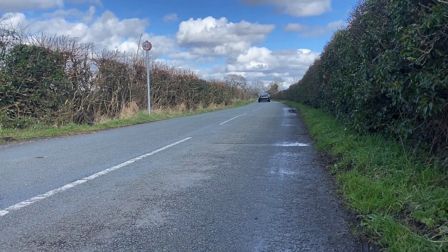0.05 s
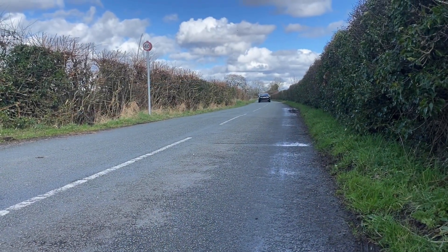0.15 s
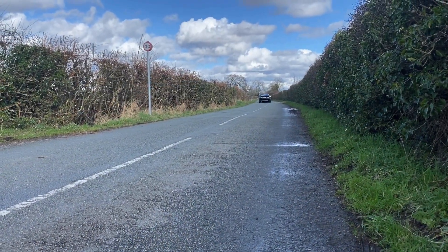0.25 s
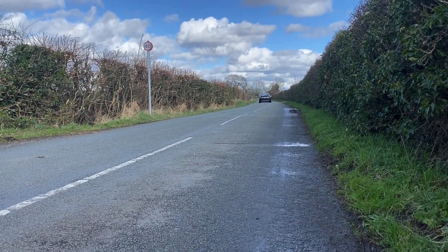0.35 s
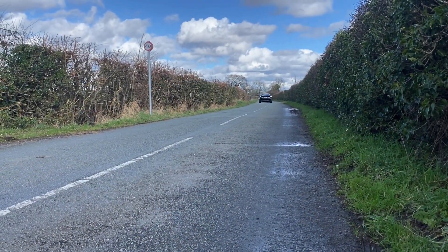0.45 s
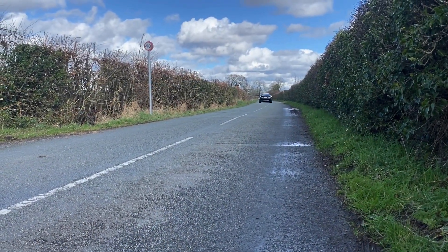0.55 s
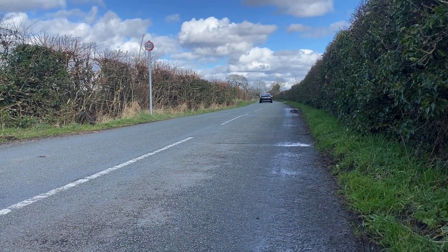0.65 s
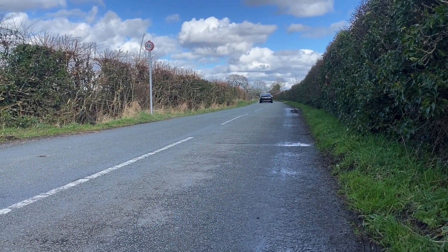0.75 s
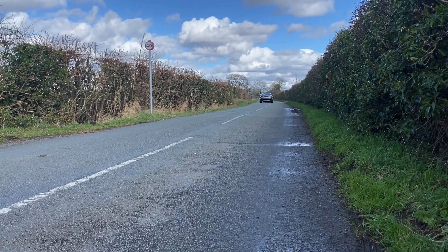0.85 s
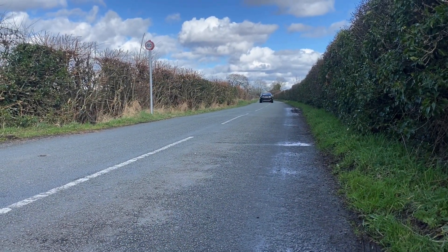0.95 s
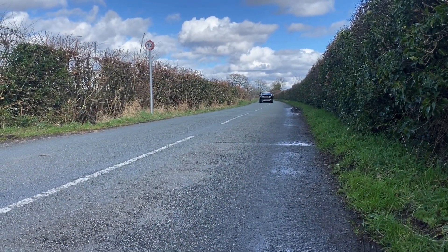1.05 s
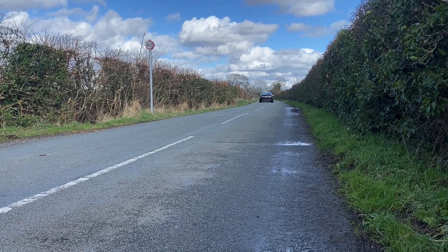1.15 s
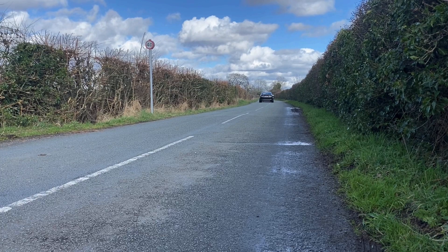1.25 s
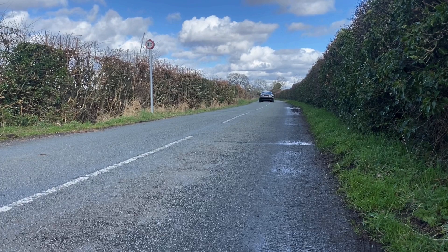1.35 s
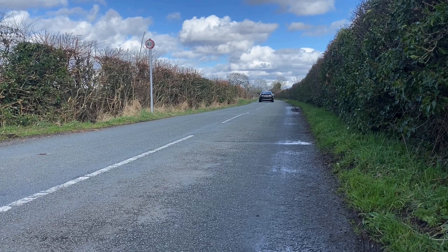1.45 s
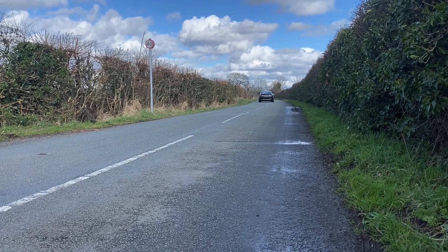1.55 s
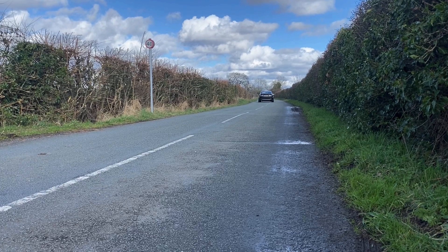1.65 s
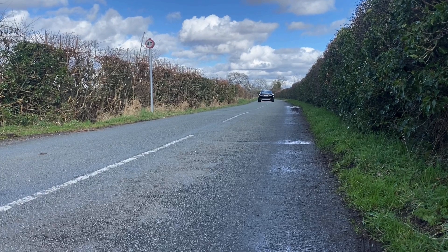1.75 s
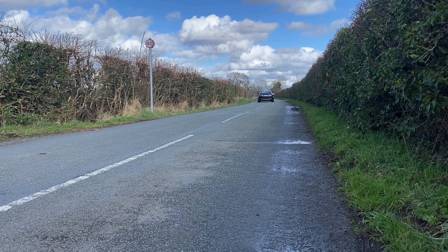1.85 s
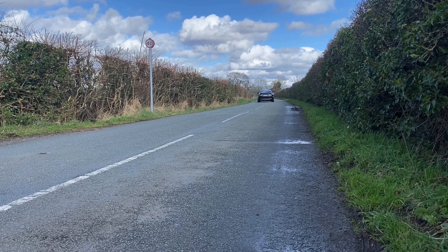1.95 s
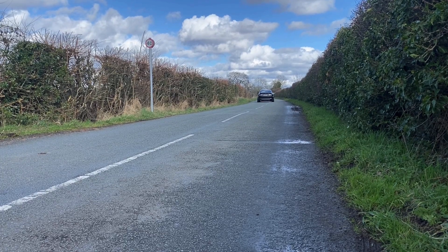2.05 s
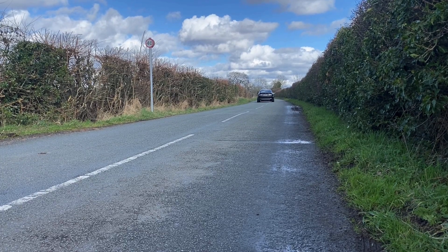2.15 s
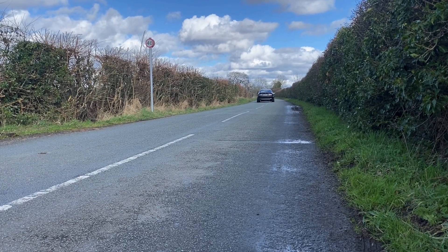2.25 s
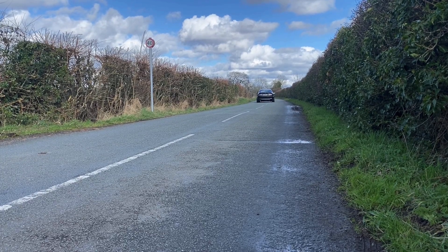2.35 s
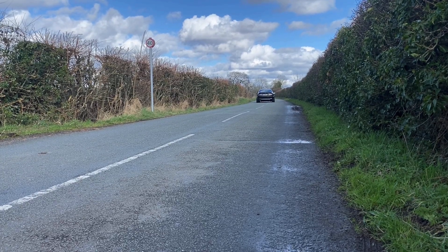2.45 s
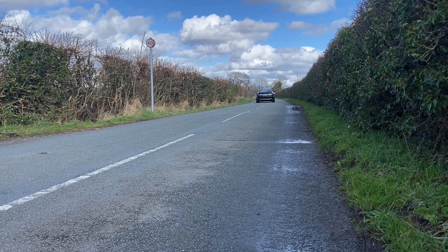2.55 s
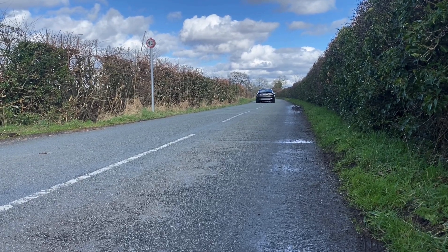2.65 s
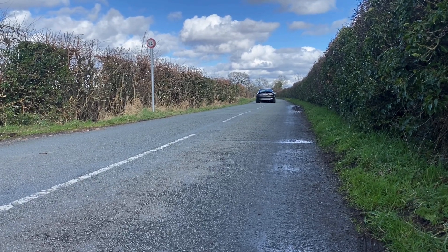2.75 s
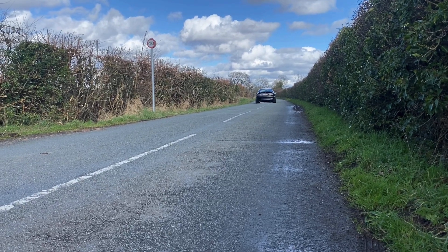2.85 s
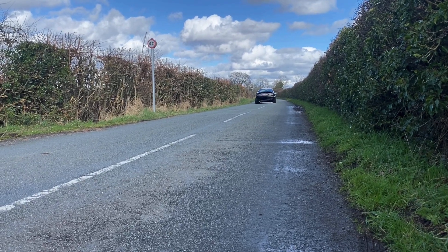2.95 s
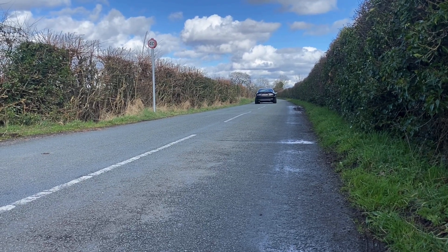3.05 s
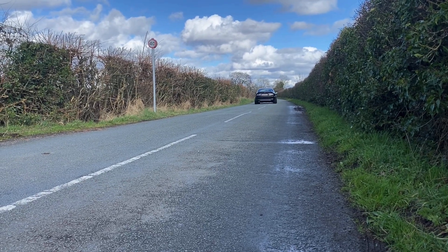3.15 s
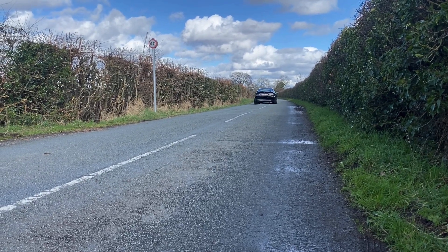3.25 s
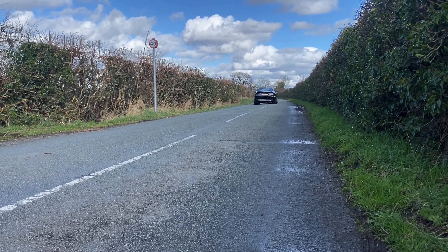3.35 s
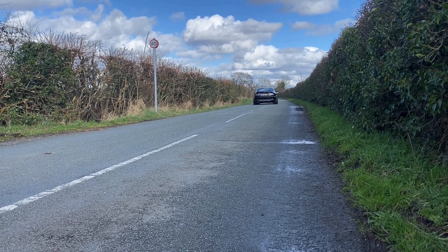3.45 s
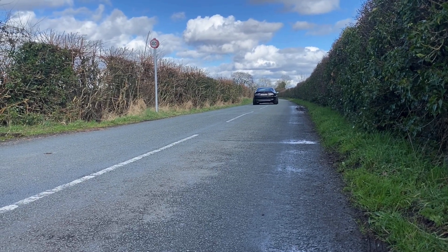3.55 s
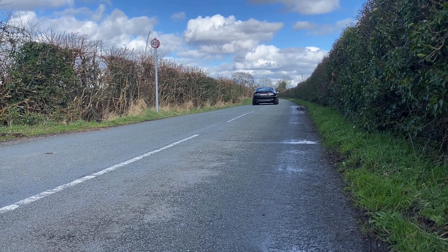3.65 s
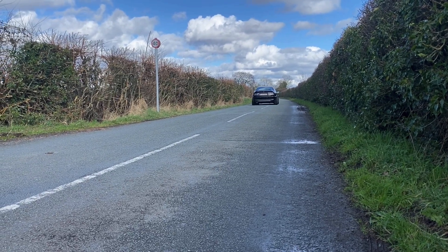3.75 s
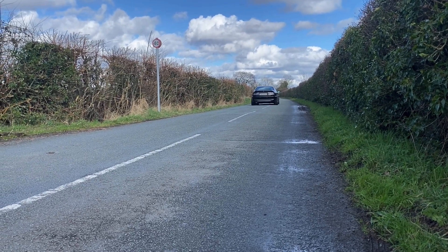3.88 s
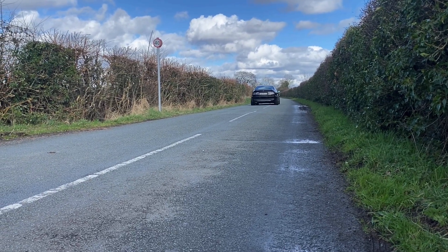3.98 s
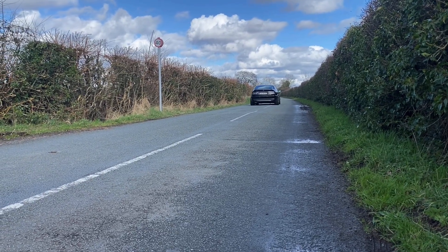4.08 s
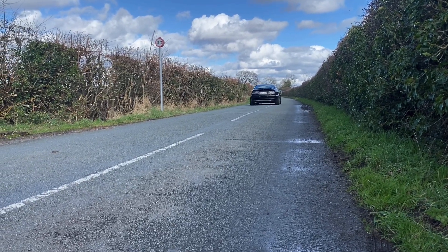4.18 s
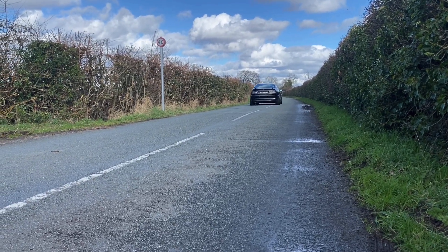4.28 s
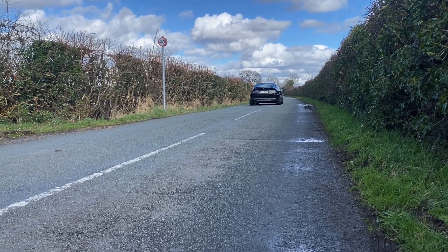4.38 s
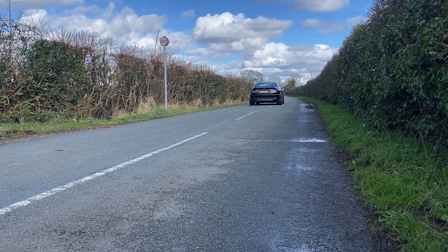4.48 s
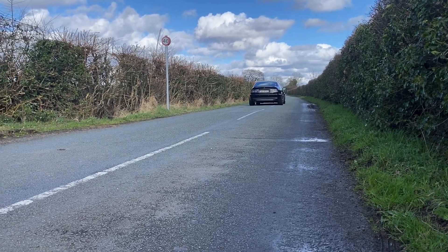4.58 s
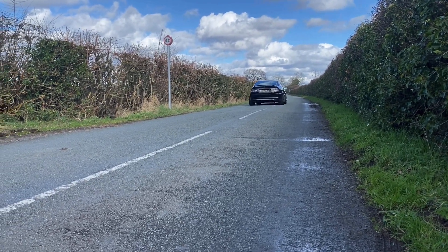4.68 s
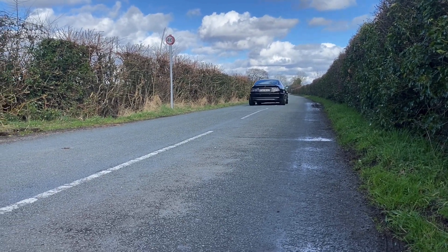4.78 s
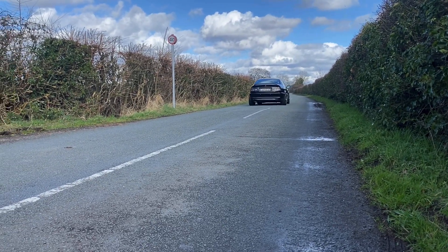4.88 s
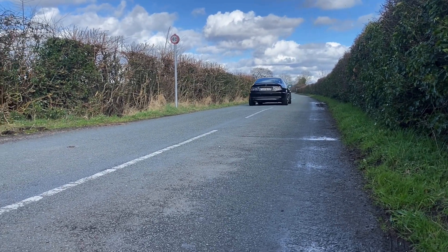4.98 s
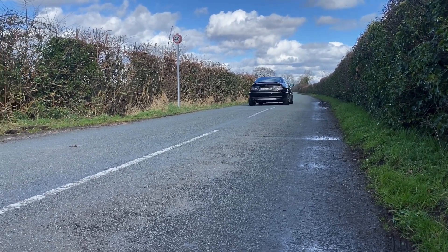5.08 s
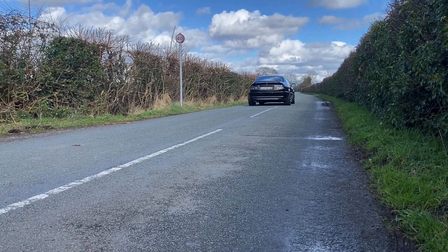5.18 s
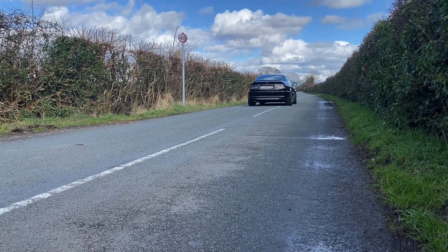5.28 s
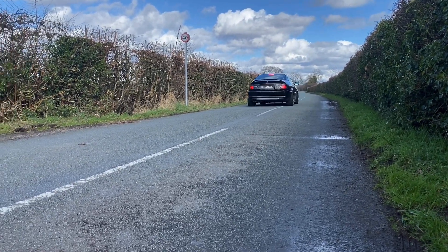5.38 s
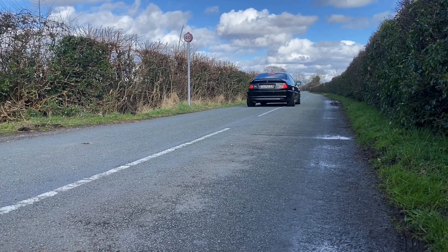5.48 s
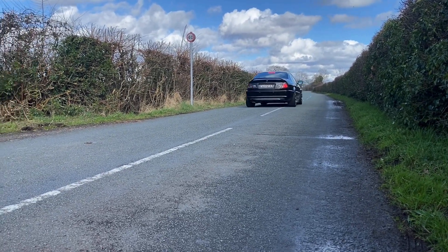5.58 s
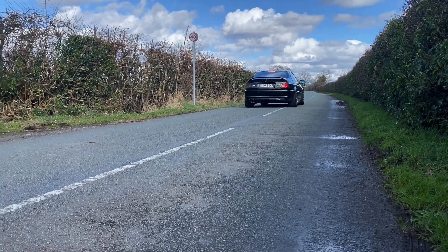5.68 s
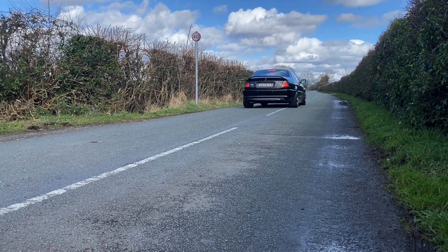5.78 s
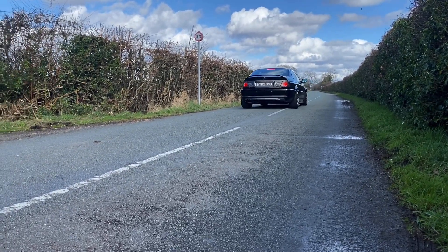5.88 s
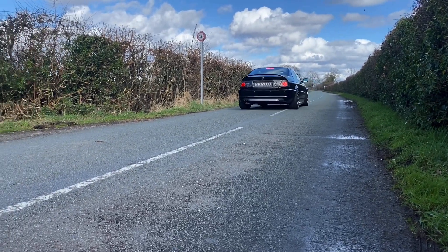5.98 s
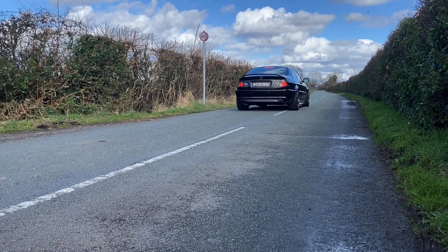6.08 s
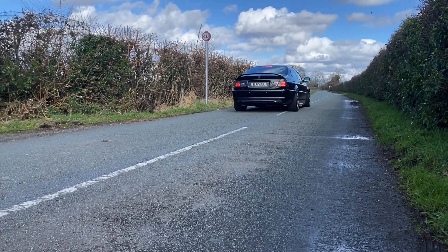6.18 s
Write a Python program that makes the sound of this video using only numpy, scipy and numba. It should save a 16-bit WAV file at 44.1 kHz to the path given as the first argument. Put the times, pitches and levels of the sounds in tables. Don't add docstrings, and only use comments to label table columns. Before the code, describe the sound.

Outdoors on a hedged country lane, a phone by the road picks up a faint, even six-cylinder drone and soft countryside hiss. Dull distant pops appear, revs sink as the car nears, and the exhaust breaks into rapid burbling, crackles and hard bangs that echo briefly off leaves. At the end a deep smooth hum returns with light brake rubbing and squeaks.

```python
import sys
import numpy as np
from scipy import signal
from scipy.fft import rfft, irfft, next_fast_len
from scipy.io import wavfile
from scipy.ndimage import uniform_filter1d
from numba import njit

SR = 44100
rng = np.random.default_rng(int(sys.argv[2]) if len(sys.argv) > 2 else 0)


def unload_wav(signal):
    wavfile.write(
        sys.argv[1],
        SR,
        np.round(np.clip(np.atleast_2d(signal).T, -1, 1) * 32767).astype(np.int16),
    )


def gain_from_db(level_db):
    decades = np.asarray(level_db, float) / 20
    return 10 ** decades


N = 274654
TIME = np.arange(N) / SR

# [t/s, engine cycles per s]
REVS = [(0, 27.5), (.7, 27.6), (1.5, 27.55), (2.1, 27.3), (2.55, 27.05), (2.9, 26.55), (3.6, 25.5),
        (4.1, 24.2), (4.6, 22.6), (5.45, 19.6), (5.62, 18.5), (5.82, 17.3), (5.9, 16.85), (6.0, 16.25),
        (6.1, 15.7), (6.23, 15.0)]
# [t/s, exhaust level/dB, unevenness of firing/dB]
LOAD = [(0, -38.5, 7), (1.0, -35, 2.5), (1.7, -34.5, 5.5), (2.5, -33.5, 3.5), (2.75, -30.5, -3),
        (3.0, -31.5, 6.5), (3.28, -30.5, 7.5), (3.35, -32.5, 13.5), (3.6, -27.5, 7), (3.72, -31.5, 10),
        (3.9, -25, 1.5), (4.3, -23, 5), (4.7, -20, 4.5), (5.1, -14, 0), (5.5, -12, 0), (5.7, -20, 3),
        (5.9, -18, 5), (6.23, -20.5, 6)]
# [multiple of the cycle, level/dB]
DRONE = [(1, -20), (2, -1.5), (3, 3.5), (4, -16), (5, -25), (6, -4.5), (7, -50), (8, -21.5), (9, 5),
         (10, -5), (11, -13.5), (12, 7.5), (13, -37.5), (14, -41), (15, -17.5), (16, -22.5), (17, -19),
         (18, 4.5), (19, -6.5), (20, -18.5), (21, -2.5), (22, -3), (23, -4), (24, -8), (25, -18), (26, -6),
         (27, -5), (28, -2.5), (29, -7.5), (30, -27.5), (31, -4), (32, 1.5), (33, -18), (34, -39),
         (35, -38.5), (36, -46)]
# [multiple of the cycle, level/dB]
HUM = [(3, -28.5), (4, -38), (5, -24.5), (7, -33.5), (9, -21), (11, -31), (13, -30.5), (15, -23.5),
       (17, -29), (18, -18.5), (19, -28), (21, -24), (22, -27), (24, -32.5), (27, -13), (30, -29.5),
       (33, -24.5), (36, -39.5), (39, -34.5), (42, -25.5), (45, -28.5)]
# [f/Hz, width/Hz, level/dB]
PIPE = [(169.3, 48, 3.5), (241, 33.3, -2.5), (310.8, 49, 2.5), (361.7, 33, -5), (461.8, 77.5, -3),
        (539.5, 213, -4), (748, 125, -4), (856, 46, -6.5), (1020, 61, -37.5), (1730, 100, -38)]
# [f/Hz, width/Hz, level/dB]
SILENCER = [(65.4, 10, -17.5), (93, 46, 9), (132, 23, 0)]
# [f/Hz, level/dB per Hz]
TYRE_HISS = [(500, -7.5), (900, 1.5), (1100, -2), (1500, -4), (2000, -7), (2600, -10.5), (3000, -18),
             (3600, -20), (4500, -22.5), (6000, -26.5), (7500, -29), (12000, -27.5), (16000, -42.5)]
# [f/Hz, level/dB per Hz]
GAS_SPIT = [(500, -23), (1000, -5), (1500, -3), (2000, -11), (2600, -15.5), (3600, -27.5), (4500, -26.5),
            (6000, -31), (8000, -33), (12000, -36), (16000, -46)]
# [t/s, share 0-1]
EVEN = [(0, 1), (3.62, 1), (3.72, .3), (3.95, 0), (5.72, 0), (5.79, 1), (6.3, 1)]
# [t/s, tone level/dB, overtone level/dB re tone]
TONE = [(4.3, -33, -2), (4.8, -23, -8), (5.0, -16.5, -4), (5.25, -12.5, -2.5), (5.45, -13, -10.5),
        (5.68, -11.5, -11.5), (5.8, -13.5, -16), (5.9, -9, -14.5), (6.05, -10.5, -6), (6.23, -9.5, 0)]
# [multiple of the cycle, level/dB]
LIFT = [(2, -19), (3, -9), (4, -8), (5, -13), (6, -13), (7, -11), (9, -14), (10, -18), (11, -19), (12, 2),
        (13, -17), (15, -21), (17, -9), (18, -8), (19, -17), (20, -19), (22, -20), (23, -17), (24, -18),
        (25, -18), (27, -17), (28, -19), (29, -18), (30, -17), (32, -24), (33, -22)]
# [t/s, distance/m, tyre hiss level/dB]
ROAD = [(0, 160, -60.5), (1, 250, -49.5), (2, 75, -47), (2.7, 100, -45.5), (3.3, 100, -42.5),
        (3.8, 87, -42.5), (4.3, 58, -41), (4.8, 29, -41), (5.3, 20, -41), (5.7, 17, -45.5), (6.23, 19, -39)]
# [f/Hz, level/dB per Hz]
COUNTRYSIDE = [(560, -19), (950, 0.5), (1060, 4.5), (1360, -10), (1580, -4.5), (1620, -14.5), (1710, 0),
               (1760, -13), (1930, -8), (2090, -5), (2440, -11.5), (2700, -8.5), (2840, -22.5), (2910, -28),
               (3260, -16), (4240, -50.5), (7170, -100)]
# [f/Hz, level/dB]
SHARED = [(7800, -1.5), (8500, -12), (9100, -20), (9700, -7.5), (12400, -1), (13200, -14), (14200, -7.5),
          (15500, -9.5)]
# [f/Hz, level/dB]
APART = [(2500, -0.5), (4500, 0.5), (6200, 4.5), (6900, -19), (7600, 7), (9000, 6), (10500, -0.5),
         (11200, -6.5), (12000, 2.5), (14500, 2), (15000, -31.5)]
# [multiple of the cycle, level/dB]
WHINE = [(60, -58), (76, -61.5)]
# [f/Hz, width/Hz, level/dB]
MOUTH = [(690, 330, 0)]
# [f/Hz, level/dB]
PORT_LAG = [(120, 16.5), (250, -17.5), (420, -15), (600, 10), (900, 0), (2000, -5), (3000, -3),
            (4500, -15.5), (7000, -3.5), (12000, -7.5)]
# [t/s, half length/s, depth level/dB]
MISSES = [
    (4.955, .03, -25),
    (5.026, .018, -20),
    (5.138, .028, -22),
    (5.185, 0.016, -14),
    (5.285, 0.036, -22),
    (5.337, .012, -4),
    (5.503, 0.027, -27.5),
    (5.654, 0.03, -7),
    (5.722, 0.028, -26),
]
# [t/s, ring level/dB, thump level/dB]
THUDS = [(1.351, -43.5, -19), (1.767, -25, -13), (2.056, -24.5, -12.5), (2.787, -25.5, -19),
         (2.907, -20.5, -17.5), (3.051, -19, -11), (3.325, -27.5, -12), (3.473, -27, -20),
         (3.512, -17.5, -24.5), (3.589, -17, -15), (3.773, -24.5, -19), (3.854, -16, -15)]
# [t/s, peak level/dB, ring f/Hz]
BURBLE = [(3.908, -15, 712), (3.948, -15.5, 668), (3.988, -13, 670), (4.002, -13.5, 732),
          (4.031, -16.5, 697), (4.095, -20.5, 523), (4.117, -23, 549), (4.138, -19, 716), (4.155, -14, 650),
          (4.197, -16, 632), (4.205, -14, 580), (4.238, -20, 634), (4.281, -16.5, 658), (4.304, -21.5, 696),
          (4.337, -12.5, 669), (4.364, -14.5, 649), (4.381, -18, 608), (4.48, -12.5, 717),
          (4.526, -16, 572), (4.569, -22.5, 757), (4.598, -26.5, 568), (4.619, -16.5, 588),
          (4.642, -14, 717), (4.704, -16.5, 711), (4.809, -18.5, 688), (4.868, -27.5, 700),
          (4.882, -11, 713), (4.944, -10, 708), (4.96, -9, 631), (4.976, -13.5, 725), (5.011, -13.5, 573),
          (5.071, -18, 716), (5.145, -22.5, 557), (5.171, -12, 579), (5.184, -15.5, 723), (5.216, -22, 701),
          (5.279, -9, 714), (5.295, -8.5, 664), (5.347, -25, 710), (5.381, -15, 567), (5.448, -9, 747),
          (5.482, -11, 754), (5.539, -27, 593), (5.553, -14.5, 690), (5.593, -21.5, 668),
          (5.662, -21.5, 697), (5.681, -19.5, 674), (5.714, -13, 674), (5.774, -23.5, 700),
          (5.797, -29, 640), (5.811, -24.5, 690), (5.833, -21, 714), (5.872, -24, 677), (5.895, -18.5, 711),
          (5.933, -23, 608), (5.952, -23.5, 708), (6.036, -20.5, 715), (6.097, -18, 699),
          (6.164, -16.5, 682)]
# [t/s, peak level/dB, ring f/Hz, gas spit level/dB re peak, shock front level/dB re peak]
BANGS = [(4.423, -3, 715, -34.5, -29.5), (4.738, -7.5, 582, -32, -37.5), (4.761, -4, 714, -45, -34),
         (4.915, -8.5, 673, -23, -40.5), (5.03, -4.5, 632, -45, -37), (5.101, -11.5, 627, -35, -38.5),
         (5.11, -6.5, 583, -22.5, -32), (5.254, -2.5, 622, -21, -31), (5.262, -6.5, 495, -25, -38.5),
         (5.404, -2, 526, -25, -14.5), (5.464, -6, 692, -29.5, -31.5), (5.499, -5.5, 672, -40.5, -38.5),
         (5.615, -1.5, 652, -25, -6), (5.698, -9, 730, -36, -27)]
# [t/s, peak level/dB]
TWIGS = [
    (0.137, -53.5),
    (0.376, -67.5),
    (.63, -63),
    (0.637, -55.5),
]
# [f/Hz, width/Hz, level/dB]
HUM_PIPE = [(435.8, 34, -7), (325.4, 100, -4), (180, 77, 4), (700, 250, -14), (555, 50, -4)]
# [f/Hz, width/Hz, level/dB]
GULP = [(226, 99, 0.5)]
# [f/Hz, level/dB per Hz]
SHOCK = [(500, -18), (900, 2.5), (1400, -6), (2600, -12.5), (3500, -25.5), (6000, -34), (8000, -28),
         (12000, -28.5)]
# [t/s, peak level/dB]
SHOVES = [(3.752, -24.5), (3.781, -15.5), (3.814, -25), (3.831, -15.5), (3.885, -11.5), (3.92, -11.5),
          (3.965, -22), (3.99, -16.5), (4.014, -22), (4.046, -11.5), (4.096, -13), (4.127, -17),
          (4.144, -19), (4.172, -20.5), (4.211, -16), (4.253, -8.5), (4.301, -13.5), (4.32, -19.5),
          (4.361, -10.5), (4.385, -11), (4.434, -12), (4.449, -13.5), (4.488, -10.5), (4.505, -19),
          (4.534, -14.5), (4.55, -13.5), (4.581, -20.5), (4.6, -12), (4.624, -22.5), (4.645, -19),
          (4.659, -17), (4.688, -8), (4.708, -10), (4.732, -10.5), (4.759, -10), (4.775, -10), (4.803, -16),
          (4.816, -13), (4.852, -11), (4.872, -10), (4.91, -8), (4.938, -6), (5.121, -7), (5.29, -6.5),
          (5.322, -10.5), (5.422, -6), (5.629, -9)]
# [t/s, half length/s, level/dB]
RUSTLES = [
    (1.47, .04, -84),
    (1.61, .07, -74),
    (1.72, .03, -75),
    (2.04, .045, -75),
    (2.26, .04, -83),
]
# [t/s, length/s, start f/Hz, end f/Hz, level/dB]
SQUEAKS = [
    (5.908, .04, 2400, 2630, -47.5),
    (5.949, 0.058, 1484, 1460, -42.5),
    (6.085, .035, 3114, 3110, -55),
    (6.113, 0.05, 3424, 3170, -54.5),
    (6.153, 0.036, 3430, 3390, -48.5),
]
# [f/Hz, width/Hz, level/dB]
SIZZLE = [(1170, 430, 3), (1660, 220, -0.5), (2740, 410, -14.5)]
# [f/Hz, left level/dB re right]
LEAN = [(60, -.1), (250, .4), (400, -1.6), (600, .5), (900, .2), (1500, 1.4), (3000, 2.1), (4500, 3),
        (10000, 0)]
# [multiple of the cycle, level/dB]
RISING = [(27, -4), (22, -15), (24, -0.5), (16.2, -7.5)]
# [t/s, level/dB]
SCRUB = [(5.6, -74.5), (5.85, -62), (6.05, -55.5), (6.23, -57)]
# [f/Hz, level/dB]
PIPE_TOP = [(250, -5.5), (400, -2.5), (880, -1), (970, -9), (1160, 0.5), (1400, -7.5), (2000, -10)]
# [f/Hz, width/Hz, level/dB]
TRIM = [(1162, 160, 23.5)]

CYLINDERS = 6
TONE_START_S = TONE[0][0]
MISS_SHARE = .3


def unit_rms(x):
    return x / np.sqrt(np.mean(x ** 2))


def curves(table):
    s, *columns = np.transpose(table)
    return [np.interp(TIME, s, c) for c in columns]


@njit
def svf(x, hz, width):
    y, b, l = np.empty(len(x)), 0., 0.
    g, k = np.tan(np.pi * hz / SR), width / hz
    for i in range(len(x)):
        v = (b + g * (x[i] - l)) / (1 + g * (g + k))
        b, l, y[i] = 2 * v - b, l + 2 * g * v, k * v
    return y


def resonate(x, modes):
    total = 0
    for k, (hz, width, db) in enumerate(modes):
        once = svf(x, 1. * hz, 0.99 * width)
        total = total + (-1) ** k * gain_from_db(db) * svf(once, 1. * hz, 0.99 * width)
    return total


def colour(x, spectrum):
    hz, db = np.transpose(spectrum)
    size = next_fast_len(len(x) + 4096)
    f = np.maximum(np.fft.rfftfreq(size, 1 / SR), 1)
    gain = gain_from_db(np.interp(np.log(f), np.log(hz), db))
    return irfft(rfft(x, size) * gain, size)[:len(x)]


def walk(rate):
    k = int(SR / rate)
    held = np.repeat(rng.standard_normal(N // k + 1), k)
    return 1.04 * uniform_filter1d(uniform_filter1d(held, k), k)[:N]


def crank():
    turns = np.cumsum(curves(REVS)[0] * (1 + 0.0016 * walk(4.5))) / SR
    return turns - turns[-1] - .033


def harmonics(turns, orders, lag, sway):
    total = 0
    for k, db in orders:
        line = np.sin(2 * np.pi * k * turns + lag[int(k)])
        total = total + gain_from_db(db) * sway[int(k) % len(sway)] * line
    return unit_rms(total)


def even_firing(turns, lift, near):
    lag = 0.91 * rng.standard_normal(64)
    sway = [gain_from_db(1.8 * walk(7) + 1.1 * walk(1.5)) for _ in range(7)]
    far = (1 - lift) * harmonics(turns, DRONE, lag, sway) + lift * harmonics(turns, LIFT, lag, sway)
    emerging = np.interp(TIME, (0.48, 1.5), (0, 1)) * (1 - lift)
    far = far + gain_from_db(-18) * emerging * harmonics(turns, RISING, lag, sway)
    hum = gain_from_db(3) * resonate(harmonics(turns, HUM, 3 * lag, sway), HUM_PIPE)
    return np.where(near, hum, far)


def gear_whine(turns):
    return sum(gain_from_db(db + 2.8 * walk(5.9)) * np.sin(2 * np.pi * k * turns) for k, db in WHINE)


def firings(turns, late, scatter_db):
    at = np.flatnonzero(np.diff(np.floor(CYLINDERS * turns)))
    delay, sign, size = rng.random((len(at), 3)).T
    pulses = np.zeros(N + SR)
    pulses[at + (late * SR * delay).astype(int)] = np.sign(sign - .5) * gain_from_db(-scatter_db * size)
    return pulses[:N]


def uneven_firing(uneven, gas, rough_db, even, near, catch):
    calm = gain_from_db(-14 * even * near - 5 * catch * (1 - even))
    overrun = gain_from_db(-6 * (1 - even) - 3.7 * even * near)
    rasp = calm * resonate(gas, PIPE[:5]) + overrun * resonate(gas, PIPE[5:])
    rasp = rasp + gain_from_db(-26.5) * resonate(uneven, MOUTH)
    sizzle = unit_rms(resonate(uneven, SIZZLE)) * gain_from_db(rough_db - 31.5 - 8 * even)
    return unit_rms(rasp) * gain_from_db(rough_db - 8.14 * even) + sizzle


def firing_tone(turns, tone_db, over_db):
    fire = 2 * np.pi * CYLINDERS * turns
    fade = np.clip((TIME - TONE_START_S) * 20, 0, 1)
    tone = gain_from_db(tone_db + 2.0) * np.sin(fire) + gain_from_db(over_db - 4.5) * np.sin(2 * fire + 0.81)
    return fade * np.sqrt(2) * tone


def engine():
    even_db, uneven_db = curves(LOAD)
    even = curves(EVEN)[0]
    near = TIME > TONE_START_S
    lift = np.clip((TIME - 2.55) / .45, 0, 1)
    turns, dips = crank(), misfire()

    tone_db, over_db = curves(TONE)
    tone_db = tone_db + dips
    over_db = tone_db + over_db + 1.5 * walk(23)
    catch = near * np.clip((tone_db + 20) / 7, 0, 1)

    rough_db = even_db + uneven_db + 1.5 * walk(14) + MISS_SHARE * dips
    boom_db = -38.5 + 2 * (even_db + 35) + 0.34 * uneven_db + 1.0 * walk(8.2) + MISS_SHARE * dips
    rumble_db = -42 + 1.38 * (even_db + 35.0) + 4 * walk(8)

    uneven = firings(turns, late=.003, scatter_db=21)
    gas = uneven + 0.02 * rng.standard_normal(N)
    steady = even_firing(turns, lift, near) * even * gain_from_db(even_db + 3.5)
    burble = uneven_firing(uneven, gas, rough_db, even, near, catch)
    boom = unit_rms(resonate(gas, SILENCER)) * gain_from_db(boom_db - 3 - 9 * (1 - even) - 20 * catch)
    rumble = unit_rms(resonate(rng.standard_normal(N), [(58.5, 16, 0)]))
    rumble = rumble * gain_from_db(rumble_db - 8.5 - 5.7 * even * near - 4.5 * catch)
    whine = gear_whine(turns) * (1 - lift)
    return steady + firing_tone(turns, tone_db, over_db) + burble + boom + rumble + whine


def tyres():
    metres, hiss_db = curves(ROAD)
    mid, side, lane, leaves = rng.standard_normal((4, N))
    wide = np.array([[1], [-1]])
    car = unit_rms(colour(mid, TYRE_HISS)) + .15 * wide * unit_rms(colour(side, TYRE_HISS))
    f, t, z = signal.stft(car * gain_from_db(hiss_db + 0.13 * walk(8.5)), SR)
    lost_db = 0.09 * (f[:, None] / 8000) ** 2.35 * np.interp(t * SR, np.arange(N), metres)
    hiss = signal.istft(z * gain_from_db(-lost_db), SR)[1][:, :N]
    field = unit_rms(colour(lane, COUNTRYSIDE)) + .12 * wide * unit_rms(colour(leaves, COUNTRYSIDE))
    return hiss + gain_from_db(-47 + .6 * walk(2.8)) * field


def hedges(x):
    t = np.arange(int(.25 * SR)) / SR
    tails = rng.standard_normal((2, len(t))) * np.exp(-t / .05) * (t > .004)
    tails /= np.sqrt(np.sum(tails ** 2, axis=1, keepdims=True))
    band = svf(svf(x, 680.0, 550.0), 680.0, 550.0)
    return np.array([signal.fftconvolve(band, tail)[:N] for tail in tails])


def rustles():
    swell = sum(gain_from_db(db) * np.exp(-((TIME - s) / half) ** 2) for s, half, db in RUSTLES)
    swell = swell * gain_from_db(4 + 3 * walk(40)) + gain_from_db(-81)
    return np.array([svf(rng.standard_normal(N) * swell, 9500., 7000.) for _ in range(2)])


def twigs():
    ticks = np.zeros(N)
    t = np.arange(200) / SR
    for s, db in TWIGS:
        i = int(s * SR)
        ticks[i:i + len(t)] += gain_from_db(db + 2.5) * np.exp(-t / 0.00058) * rng.standard_normal(len(t))
    return svf(ticks, 6400.0, 3500.)


def pop_rows():
    no_shock_db = -60
    return ([(s, db, 491, thump_db, -38, no_shock_db) for s, db, thump_db in THUDS]
            + [(s, db, hz, db - 6.5, -41.5, no_shock_db) for s, db, hz in BURBLE]
            + [(s, db, hz, db - 3.5, spit_db, shock_db) for s, db, hz, spit_db, shock_db in BANGS])


def pops():
    rings, kicks, thumps, spits, fronts = np.zeros((5, N + SR))
    t = np.arange(int(.15 * SR)) / SR
    sweep = t * (1 + .2 * np.exp(-t / 0.00093))
    ring_decay = np.exp(-(t / .0035) ** 1.3) * (1 - np.exp(-t / .0006))
    thump = np.sin(2 * np.pi * 80 * t) * np.exp(-t / 0.017) * (1 - np.exp(-t / 0.013))
    body = np.sin(2 * np.pi * 303.5 * t) * np.exp(-t / 0.0081) * (1 - np.exp(-t / 0.0013))
    spit = .4 * np.exp(-t / .0017) + .6 * np.exp(-t / .009) * (1 - np.exp(-(t / .005) ** 2))
    for s, db, hz, thump_db, spit_db, shock_db in pop_rows():
        i = int(s * SR)
        span = slice(i, i + len(t))
        rings[span] -= gain_from_db(db + 7) * np.sin(2 * np.pi * hz * sweep) * ring_decay
        thumps[span] += gain_from_db(thump_db + 3.0) * thump - gain_from_db(db - 3) * body
        kicks[i] = gain_from_db(db)
        fronts[i + 12:i + 14] = -gain_from_db(db + shock_db) * np.array([1, .5])
        spits[span] += gain_from_db(db + spit_db) * spit * rng.standard_normal(len(t))
    kicks = kicks[:N]
    back = 0.088 * np.roll(rings, int(0.011 * SR)) + 0.044 * np.roll(rings, int(0.016 * SR))
    pipe = gain_from_db(35) * resonate(kicks, PIPE[1:5]) + gain_from_db(24) * resonate(kicks, PIPE[6:8])
    spit_gain = gain_from_db(9.5) / np.std(colour(rng.standard_normal(SR), GAS_SPIT))
    crack = spit_gain * colour(spits[:N], GAS_SPIT) + gain_from_db(31.0) * colour(fronts[:N], SHOCK)
    return colour((rings + back)[:N], PIPE_TOP) + thumps[:N] + pipe - resonate(kicks, TRIM) + crack


def gulps():
    puffs = np.zeros(N)
    t = np.arange(int(.05 * SR)) / SR
    for s, _, thump_db in THUDS:
        i = int(s * SR)
        puffs[i:i + len(t)] = gain_from_db(thump_db + 9.0) * np.exp(-t / 0.034) * rng.standard_normal(len(t))
    return resonate(puffs, GULP)


def shoves():
    out = np.zeros(N)
    t = np.arange(-1323, 1323) / SR
    detune = gain_from_db(1.4 * rng.standard_normal((len(SHOVES), 1)))
    turn = 2 * np.pi * 104 * detune * t
    pushes = (np.cos(turn) + gain_from_db(-13.5) * np.cos(2 * turn)) * np.exp(-(t / 0.012) ** 2)
    for (s, db), push in zip(SHOVES, pushes):
        i = int(s * SR)
        out[i - len(t) // 2:i + len(t) // 2] += gain_from_db(db) * push
    return out - uniform_filter1d(out, size=900)


def misfire():
    return sum(depth_db * np.clip(1 - np.abs(TIME - s) / half, 0, 1) for s, half, depth_db in MISSES)


def scrub():
    grain = resonate(rng.standard_normal(N), [(3380, 1200, -0.5), (2400, 360, -0.5)])
    return gain_from_db(curves(SCRUB)[0] + 2.0 * walk(30)) * unit_rms(grain)


def squeaks():
    out = np.zeros(N)
    for s, length, from_hz, to_hz, db in SQUEAKS:
        i, size = int(s * SR), int(length * SR)
        phase = 2 * np.pi * np.cumsum(np.linspace(from_hz, to_hz, size)) / SR
        out[i:i + size] += gain_from_db(db) * np.hanning(size) * np.sin(phase)
    return out


def scene():
    car = engine() + pops() + gulps() + shoves() + scrub() + squeaks()
    pan_db = np.linspace(-.6, -1.5, N)
    direct = car * gain_from_db(np.array([pan_db, -pan_db]) / 2)
    return direct + gain_from_db(-16) * hedges(car) + tyres() + rustles() + twigs()


def band_limit(x):
    return signal.sosfilt(signal.butter(12, 15740, fs=SR, output="sos"), x)


def record(dry):
    left, right = [colour(port, np.multiply(LEAN, [1, sign / 2])) for port, sign in zip(dry, (1, -1))]
    both = left + right
    mid = colour(both, SHARED) / 2
    delay = 0.84 * colour(np.gradient(both), PORT_LAG)
    side = colour(left - right + delay, APART) / 2
    ports = np.tanh(1.05 * np.array([mid + side, mid - side])) / 1.05
    return band_limit(ports)


dry = scene()
out = record(dry)
unload_wav(out)
```